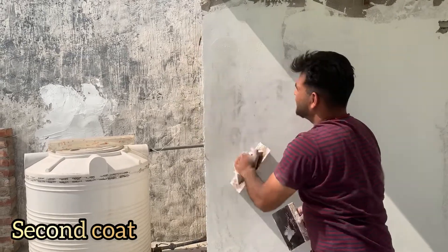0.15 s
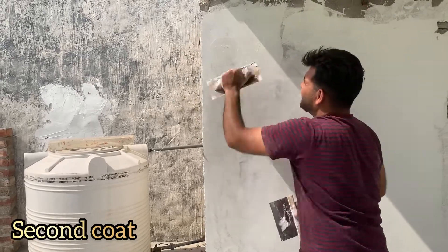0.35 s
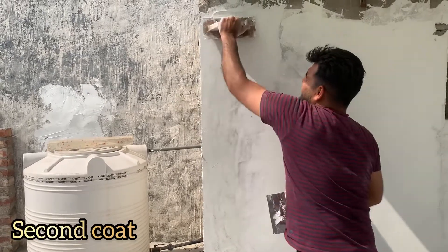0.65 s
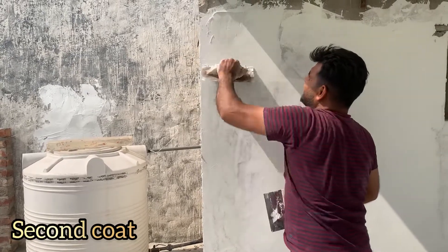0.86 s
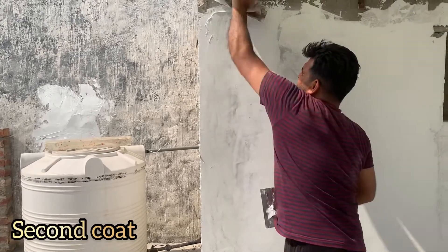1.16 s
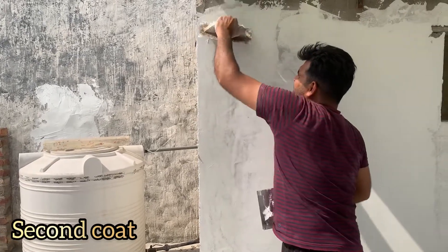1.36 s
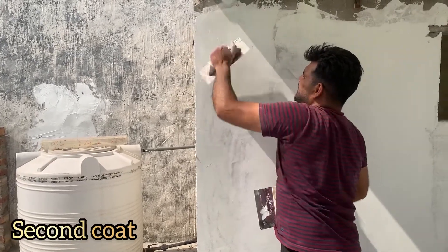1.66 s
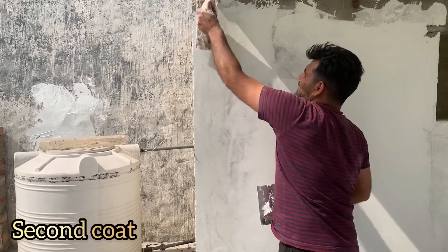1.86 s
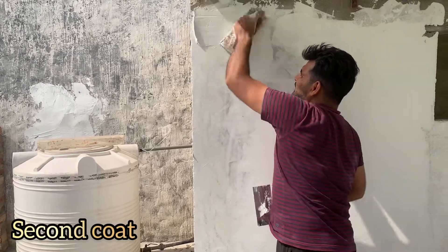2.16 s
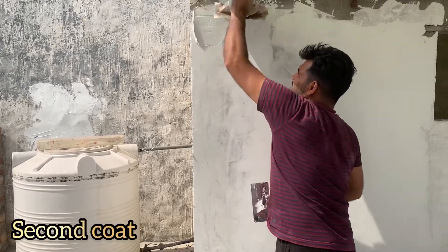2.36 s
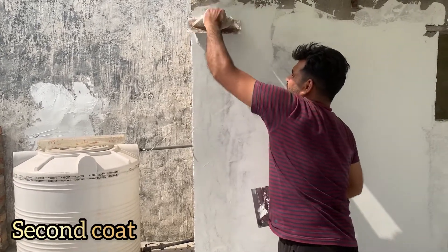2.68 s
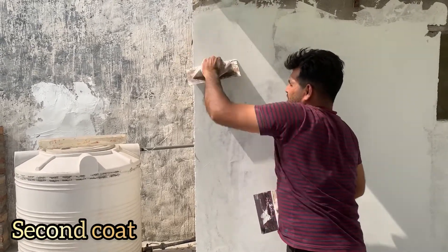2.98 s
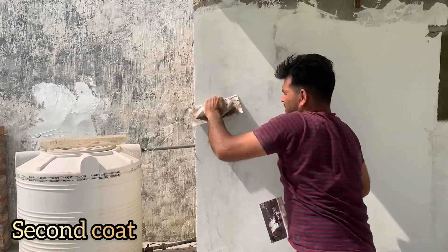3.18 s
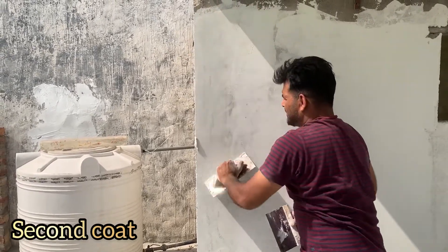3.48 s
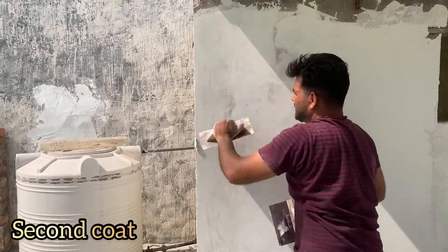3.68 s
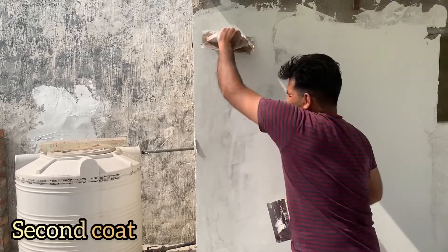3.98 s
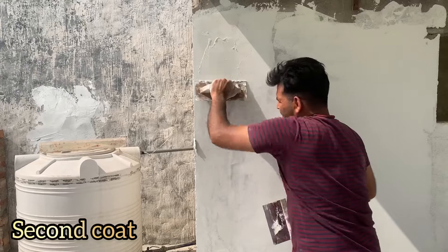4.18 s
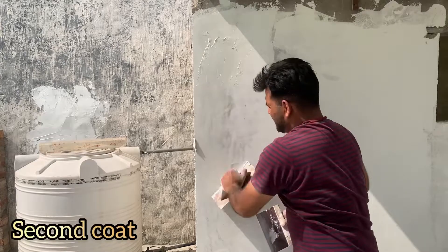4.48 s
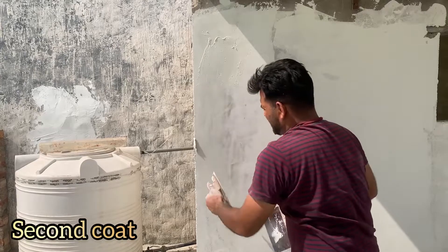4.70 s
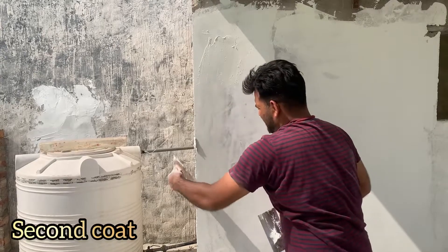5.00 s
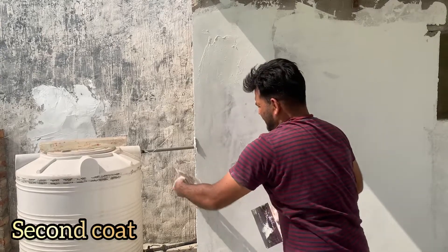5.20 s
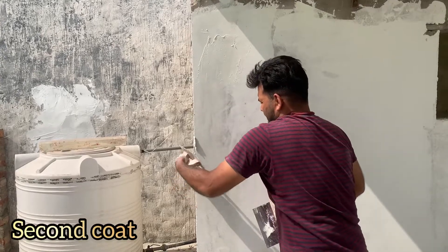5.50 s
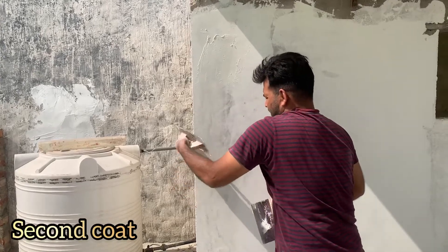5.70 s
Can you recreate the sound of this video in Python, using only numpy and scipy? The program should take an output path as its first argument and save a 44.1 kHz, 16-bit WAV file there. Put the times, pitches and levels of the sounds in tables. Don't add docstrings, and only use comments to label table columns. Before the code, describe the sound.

Short, sandy metallic scrapes and hand-damped blade knocks, loud at first, then sparse and faint, above a deep wavering engine rumble outdoors.

```python
import sys
import numpy as np
from scipy import signal
from scipy.fft import rfft, irfft, next_fast_len
from scipy.io import wavfile

SR = 44100
rng = np.random.default_rng(int(sys.argv[2]) if len(sys.argv) > 2 else 0)


def linear_from_db(decibels):
    return 10 ** (np.asarray(decibels, float) / 20)


def int16_out(signal):
    q = np.round(np.clip(np.atleast_2d(signal).T, -1, 1) * 32767)
    wavfile.write(sys.argv[1], SR, q.astype(np.int16))


N = 257984

# pitch_hz, width_hz, level_db
EDGE_MODES = [(2530, 260, -4), (2924, 28, 2.5), (3018, 69, -4), (3630, 160, -0.5), (3610, 200, -4.5),
              (3983, 120, 5), (4300, 240, -0.5), (4986, 456, -1), (6500, 22, -24.5)]
# pitch_hz, width_hz, level_db
DEEP_MODES = [(424, 160, -13.5), (496, 54, -9.5), (610.4, 28, -1), (738.6, 34, 1.5), (864, 150, -7)]


def unit(x):
    return x / np.sqrt(np.mean(x ** 2))


def spectrum(table, hz):
    points_hz, values = np.array(table).T
    return np.interp(np.log(hz + 1), np.log(points_hz + 1), values)


def shape(x, gain_at):
    size = 2 * next_fast_len(N // 2 + SR // 4, True)
    hz = np.arange(size // 2 + 1) * SR / size
    return irfft(rfft(x, size) * gain_at(hz), size)[..., :N]


def mode(x, hz, width_hz):
    return signal.lfilter(*signal.iirpeak(hz, hz / width_hz, fs=SR), x)


def band(x, hz, width_hz):
    return mode(mode(x, hz, width_hz), hz, width_hz)


def walk(rate):
    knots = np.arange(0, N + SR, SR / rate)
    return 1.2 * np.interp(np.arange(N), knots, rng.standard_normal(len(knots)))


def ring(force, modes, flicker_db=None):
    total = 0
    for k, (hz, width_hz, db) in enumerate(modes):
        if flicker_db:
            db = db + flicker_db * walk(40)
        total = total + (-1) ** k * linear_from_db(db) * mode(force, hz, width_hz)
    return total


def flexing(force, centre_hz, focus, flicker_db=None):
    # pitch_hz, width_hz, level_db
    flex_modes = [(900, 22.3, 0), (1000, 55.5, 5), (1175, 190, -4.5), (1313.6, 16.4, 4.5),
                  (1434.5, 31, 3.5), (1530, 49, 0.5), (1603, 112, 0), (1840, 168, -2), (1960, 71, 1),
                  (2039, 46, -0.5), (2285, 280, -8.5)]
    favoured = [(hz, width_hz, db - focus * np.log2(hz / centre_hz) ** 2) for hz, width_hz, db in flex_modes]
    return ring(force, favoured, flicker_db)


def grit(rate, spread_db):
    when, size, sign = rng.random((3, N))
    caught = when < rate / SR
    return unit(caught * linear_from_db(-spread_db * np.log(size + 0.023)) * np.sign(sign - 0.5))


def sweeps():
    # fastest_s, speeding_up_s, slowing_down_s, level_db, stood_on_edge_db
    arm_sweeps = [(0.058, 0.1, 0.065, -41, 1.5), (0.73, 0.088, 0.14, -40.5, 0.5),
                  (0.838, 0.078, 0.031, -41.5, -6), (1.142, 0.02, .04, -26, -10.5),
                  (1.271, 0.11, 0.094, -22.5, -5.5), (1.47, 0.32, 0.11, -43.5, -0.5),
                  (1.985, 0.027, 0.025, -60.5, 7), (2.077, 0.061, 0.076, -27, 2.5),
                  (2.139, 0.027, 0.05, -26, -4.5), (2.22, 0.061, 0.066, -53.5, -7),
                  (2.433, 0.024, 0.043, -26.5, -14.5), (2.598, .12, 0.069, -24, -8.5),
                  (2.70, 0.12, .12, -46.5, -7.5), (2.861, 0.13, 0.13, -50, 1),
                  (3.03, 0.11, 0.13, -50, -0.5), (3.299, 0.27, 0.19, -45.5, 2),
                  (3.503, 0.14, 0.039, -44, -4), (4.029, 0.037, 0.088, -45, -1),
                  (4.222, .17, 0.31, -40.5, 2), (4.469, 0.24, 0.059, -44, 5.5),
                  (5.35, 0.076, .04, -55, -6.5), (5.429, 0.087, .035, -47, -7),
                  (5.508, 0.034, 0.084, -45.5, -8.5), (5.59, .05, 0.07, -52.5, -13.5)]
    dab_scuffs = [(0.024, 0.012, 0.035, -34.5, -5), (0.583, 0.012, .02, -33.5, -19.5),
                  (0.61, .03, 0.13, -52, -4.5), (1.116, 0.013, 0.01, -35.5, -12),
                  (1.19, 0.046, 0.055, -27.5, -3), (2.028, 0.019, .05, -29, -6),
                  (2.408, .006, 0.018, -32.5, -14.5), (3.451, 0.0076, 0.0085, -25.5, -14),
                  (3.94, 0.0071, .025, -45.5, -19), (4.001, 0.0024, 0.033, -32, -14.5),
                  (4.445, .012, 0.024, -25, -10), (4.66, 0.11, 0.14, -58, -2.5),
                  (4.755, 0.039, 0.052, -51.5, 6.5)]
    ends_db, roundness = 23, 1.89
    t = np.arange(0, N / SR + 0.001, 0.001)
    s, rise, fall, db, edge_db = np.concatenate([arm_sweeps, dab_scuffs]).T[:, :, None]
    away = np.where(t < s, (s - t) / rise, (t - s) / fall)
    power = linear_from_db(2 * (db - ends_db * np.minimum(away, 3) ** roundness)) + 1e-30
    total = power.sum(axis=0)
    level_db = 10 * np.log10(total)
    stance_db = (power * edge_db).sum(axis=0) / total
    dab_share = power[len(arm_sweeps):].sum(axis=0) / total
    return [np.interp(np.arange(N) / SR, t, c) for c in (level_db, stance_db, dab_share)]


def strokes():
    # time_s, centre_hz
    grip_points = [(0.0, 1270), (0.7, 1500), (0.9, 1320), (1.12, 1020), (1.2, 1350), (1.5, 1400),
                   (2.0, 1980), (2.09, 1950), (2.13, 1340), (2.42, 1580), (2.72, 1400), (3.12, 1480),
                   (3.17, 1890), (3.33, 1560), (4.0, 1080), (4.3, 1600), (4.5, 1300), (5.3, 1040)]
    # freq_hz, density_db (per Hz)
    sand_colour = [(1200, -32.5), (3500, -5.5), (4800, -14.5), (5500, -6), (6500, -7), (7800, -10.5),
                   (9000, -5.5), (10000, -8.5), (12000, -10), (13000, -7.5), (14000, -17.5), (15500, -21.5)]
    level_db, stance_db, dab = sweeps()
    centre_hz = np.interp(np.arange(N) / SR, *np.transpose(grip_points))

    deep_db = -13 - 1.17 * stance_db + 0.083 * (level_db + 25) - 7.5 * dab
    deep_db = deep_db - 39 * np.log2(np.maximum(centre_hz / 1460, 1))
    hiss_db = -9 + 0.77 * stance_db - 9 * dab - 0.074 * (np.maximum(level_db, -60) + 40)

    stutter_db = 0.9 * walk(45) + 1.3 * walk(160)
    coarse = grit(rate=2500, spread_db=3.0) * linear_from_db(0.55 * walk(70))
    fine = grit(rate=9200, spread_db=5.5)
    dust = grit(rate=30000, spread_db=1.6)

    body = unit(flexing(coarse, centre_hz, focus=8.1, flicker_db=3.5))
    deep = linear_from_db(deep_db - 3.0) * unit(ring(coarse, DEEP_MODES, flicker_db=1.5))
    edge = linear_from_db(stance_db + 1.0) * unit(ring(fine + 0.46 * coarse, EDGE_MODES, flicker_db=3.5))
    hiss = linear_from_db(hiss_db + 6.5) * unit(shape(dust, lambda hz: linear_from_db(spectrum(sand_colour, hz))))
    return linear_from_db(level_db - 1.0 + stutter_db) * (body + deep + edge + hiss)


def engine_and_town():
    # time_s, firing_hz, level_db
    engine_course = [(0.0, 55.1, -23.5), (0.139, 53.5, -26.5), (0.42, 53, -27.5), (0.55, 54.23, -32.5),
                     (0.76, 53.06, -34.5), (1.0, 52.76, -28.5), (1.1, 53.2, -28), (2.15, 53, -25.5),
                     (2.7, 52.77, -27), (2.98, 52.85, -38), (3.35, 53.2, -32.5), (3.68, 54.05, -38),
                     (4.4, 52.06, -38.5), (4.53, 51.62, -51), (4.85, 52.3, -31.5), (5.25, 50.4, -39),
                     (5.46, 52.3, -49.5), (5.6, 51.6, -38.5)]
    # freq_hz, density_db (per Hz)
    town_colour = [(65, -4.5), (85, -2.5), (140, -5), (175, -12), (205, -17), (250, -17), (450, -19.5),
                   (700, -28.5), (1000, -25.5), (2200, -39), (2800, -37), (3600, -47.5), (6500, -61.5),
                   (9000, -80)]
    # time_s, level_db
    bustle_course = [(0.0, -50), (1.0, -52.5), (2.1, -51.5), (2.4, -50.5), (2.95, -52), (3.25, -46.5),
                     (3.8, -52), (4.15, -51.5), (4.5, -49.5), (4.9, -53), (5.85, -54)]
    # freq_hz, correlation (-1 to 1)
    port_likeness = [(60, 0.99), (130, 0.65), (290, 0.7), (640, 0.61), (1400, 0.55), (3100, .05)]
    town_db, port_lag = -40, 19

    t = np.arange(N) / SR
    s, *columns = np.transpose(engine_course)
    tone_hz, tone_db = (np.interp(t, s, c) for c in columns)
    phase = 2 * np.pi * np.cumsum(tone_hz + 0.8 * walk(7.2)) / SR
    tone = np.sqrt(2) * np.sin(phase) * linear_from_db(1.2 * walk(11))
    skirt = unit(band(rng.standard_normal(N), 57, 42))
    engine = tone + linear_from_db(-11.5) * skirt

    bass_db = 1.1 * walk(2.77)
    bass_db = bass_db - bass_db.mean()
    bustle_db = np.interp(t, *np.transpose(bustle_course))
    bustle_db = bustle_db - bustle_db.mean()
    hum = 0
    for hz in 70 * 2 ** np.arange(0, 7.1, 1 / 3):
        mid, side = band(rng.standard_normal((2, N)), hz, hz / 3)
        like = np.clip(spectrum(port_likeness, hz), -1, 1)
        bass_share = min(1, 110 / hz) ** 2
        swell_db = bass_share * bass_db + (1 - bass_share) * bustle_db
        db = spectrum(town_colour, hz) + swell_db + 1.3 * walk(6.5)
        stereo = np.sqrt(1 + like) * mid + np.sqrt(1 - like) * side * np.array([[1], [-1]])
        hum = hum + linear_from_db(db) * stereo
    engine_gain = linear_from_db(tone_db + np.array([[-0.55], [0.55]]))
    left, right = engine_gain * engine + linear_from_db(town_db) * unit(hum)
    return np.array([np.pad(left, (port_lag, 0), "edge")[:N], right])


def drones():
    # pitch_hz, width_hz, level_db
    drone_bands = [(48.2, 11, -45.5), (104.9, 5.2, -53.5), (136.4, 5.4, -50), (201.5, 6.8, -56)]
    total = linear_from_db(-44.5 + 1.5 * walk(3)) * unit(band(rng.standard_normal(N), 66.1, 5))
    for hz, width_hz, db in drone_bands:
        total = total + linear_from_db(db + 2.8 * walk(2.5)) * unit(band(rng.standard_normal(N), hz, width_hz))
    return total


def insects():
    fade = np.interp(np.arange(N) / SR, [0, 0.5, 0.7], [1, 0.9, 0])
    shimmer = mode(mode(rng.standard_normal((2, N)), 5600, 1800), 5200, 1800)
    return linear_from_db(-73.5) * fade * unit(shimmer)


def ticks():
    # start_s, peak_db, pitch_hz
    stone_snaps = [
        (0.0144, -13.5, 2500),
        (0.165, -35, 3450),
        (2.0114, -30, 2060),
        (3.3139, -26, 2920),
        (3.9975, -43, 2100),
        (4.68, -41.5, 2004),
        (4.74, -35.5, 4237),
        (4.9, -48.5, 2010),
        (5.5996, -45.5, 2670),
    ]
    out, t = np.zeros(N + SR), np.arange(SR // 40) / SR
    for s, db, hz in stone_snaps:
        snap = mode(rng.standard_normal(len(t)) * np.exp(-t / 0.0011), hz, 1700)
        start = int(s * SR)
        out[start:start + len(t)] += linear_from_db(db) * snap / np.abs(snap).max()
    return out[:N]


def knocks():
    # start_s, peak_db, pitch_hz, brightness_db
    flat_landings = [
        (0.018, -15, 1020, -16),
        (0.575, -15, 1280, -12),
        (1.109, -23.5, 971, -19),
        (1.133, -10.5, 973, -27),
        (2.403, -18.5, 1830, -36),
        (2.424, -19.5, 1434, -5),
        (3.447, -14.5, 1442, -22),
        (4.443, -14.5, 1340, -31),
    ]
    edge_slips = [(0.165, -56.5, 1060, 13), (1.182, -19, 1610, -20), (1.239, -20.5, 1257, -24.5),
                  (1.982, -40, 1999, -5), (2.033, -31.5, 2050, 8), (2.13, -13, 1065, -1),
                  (2.158, -18.5, 1470, -9), (3.007, -36, 1490, 6.5), (3.179, -27.5, 1901, -19),
                  (3.316, -33.5, 1960, -4), (3.506, -50, 1526, -27), (3.937, -26, 1013, -15),
                  (3.997, -21, 950.5, -25), (4.119, -23.5, 1695, -9), (4.5, -29, 2002, -12),
                  (4.738, -38.5, 1252, 11), (5.358, -31.5, 942, -9.5), (5.43, -28, 1000, -15),
                  (5.486, -28, 1530, -10), (5.519, -29.5, 988, -15), (5.805, -48, 895, 7)]
    blows = [(*k, 0.071, 4) for k in flat_landings] + [(*k, 0.036, -18.5) for k in edge_slips]
    out, t = np.zeros(N + SR), np.arange(SR // 7) / SR
    for s, db, hz, bright_db, t60, deep_db in blows:
        crack = np.exp(-t / 0.0017)
        crunch = (1 - np.exp(-t / 0.00068)) * linear_from_db(-60 * t / t60)
        rub = rng.standard_normal(len(t)) * (crack + crunch)
        damping = linear_from_db(-30 * t / t60)
        low = flexing(rub, hz, focus=14.0) + linear_from_db(deep_db) * ring(rub, DEEP_MODES) + 0.034 * mode(rub, hz, 900)
        high = ring(rub, EDGE_MODES) * damping + 0.053 * mode(rub, 3000, 3000)
        blow = low * damping / np.abs(low).max() + linear_from_db(bright_db) * high / np.abs(high).max()
        start = int(s * SR)
        out[start:start + len(t)] += linear_from_db(db - 4.5) * blow
    return out[:N]


def echo(hz, t60, colour):
    t = np.arange(SR // 2) / SR
    tail = rng.standard_normal((2, len(t))) * linear_from_db(-60 * t / t60) * (1 - np.exp(-t / 0.0038))
    tail = tail / np.sqrt(np.sum(tail[0] ** 2))
    return linear_from_db(spectrum(colour, hz)) * rfft(tail, 2 * len(hz) - 2)


def path(hz):
    # freq_hz, left_lead_radians
    port_phase = [(0, 0), (1700, -.4), (2400, 0), (4100, 1.3), (4800, 2.9), (5400, 3.5), (6100, 6.1),
                  (7100, 8.7), (7500, 10.1), (8100, 10.5), (8700, 9.4), (10200, 6.28), (11650, 3.5),
                  (12150, 2.85), (13500, 0), (15000, -3.14)]
    # freq_hz, left_minus_right_db
    port_tilt = [(50, -9), (250, 0.5), (1000, -.5), (7400, -1.5), (8300, -4.5), (9500, -0.5)]
    left_right = np.array([[1], [-1]])
    direct = np.exp(0.5j * np.interp(hz, *np.transpose(port_phase)) * left_right)
    close = echo(hz, t60=0.043, colour=[(500, -6.5), (1500, -7.5), (3000, 1.0), (4400, -12.5), (5100, -5.5),
                                        (6300, -3.0), (7300, -8), (8200, 2.5), (10000, -21.5)])
    far = echo(hz, t60=0.39, colour=[(500, -18.5), (3000, -15.0), (7000, -25.5), (12000, -38)])
    return (direct + close + far) * linear_from_db(spectrum(port_tilt, hz) / 2 * left_right)


def scene():
    trowel = strokes() + knocks() + ticks()
    place = np.clip(0.5 + 1.16 * walk(9), 0, 1)
    on_wall = shape(trowel * place, path) + shape(trowel * (1 - place), path)
    return on_wall + engine_and_town() + drones() + insects()


def top_cut(x):
    return signal.sosfilt(signal.butter(12, 15820, fs=SR, output="sos"), x)


def record(dry):
    # freq_hz, density_db (per Hz)
    hiss_colour = [(5000, -8.5), (8500, -19.5), (10000, -4), (11800, -12.5), (13500, -3.5), (15000, -10)]
    noise = rng.standard_normal((2, N))
    hiss = linear_from_db(-82.0) * unit(shape(noise, lambda hz: linear_from_db(spectrum(hiss_colour, hz))))
    mix = np.tanh(1.77 * (dry + hiss)) / 1.836
    return top_cut(mix)


dry = scene()
out = record(dry)
int16_out(out)
```